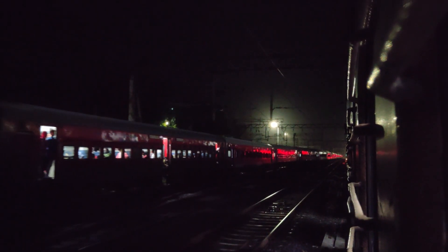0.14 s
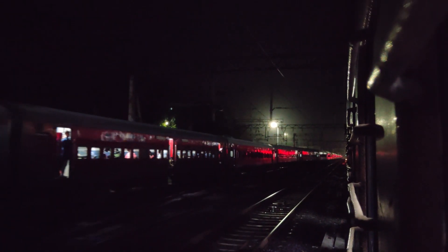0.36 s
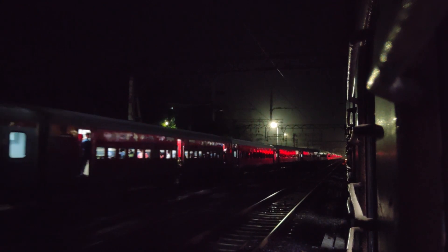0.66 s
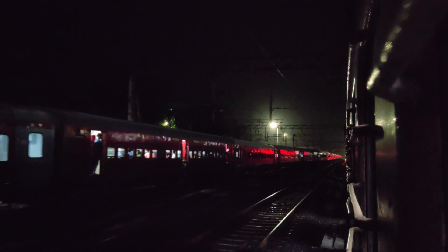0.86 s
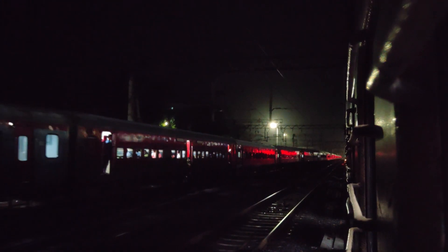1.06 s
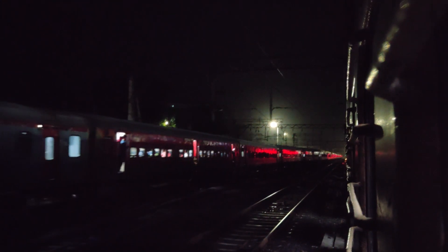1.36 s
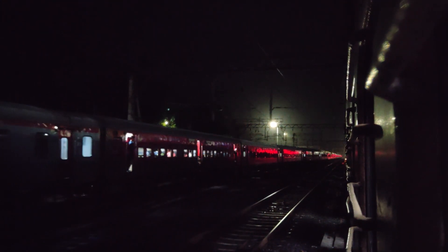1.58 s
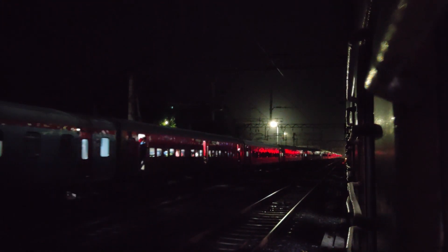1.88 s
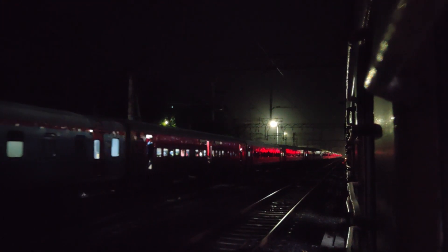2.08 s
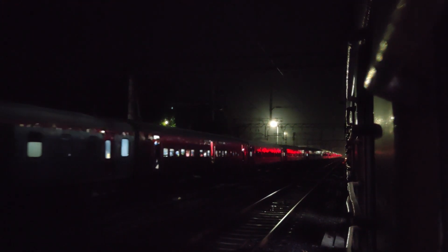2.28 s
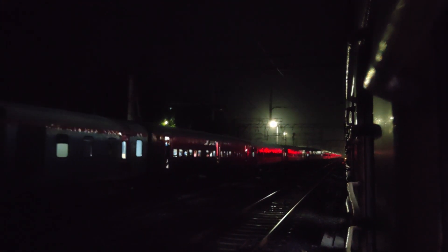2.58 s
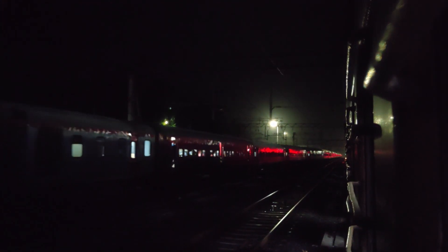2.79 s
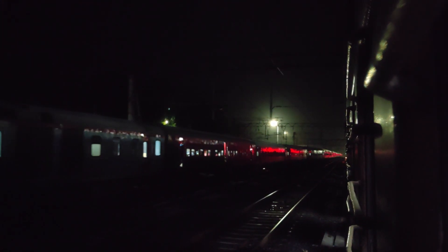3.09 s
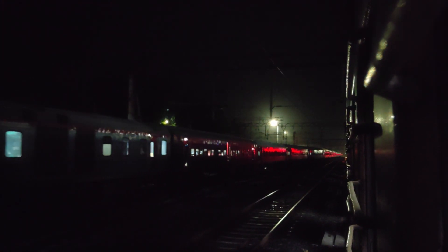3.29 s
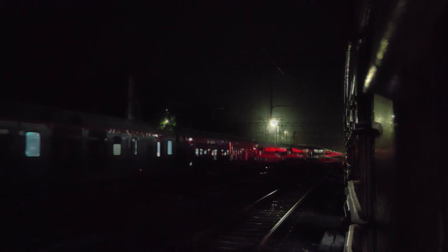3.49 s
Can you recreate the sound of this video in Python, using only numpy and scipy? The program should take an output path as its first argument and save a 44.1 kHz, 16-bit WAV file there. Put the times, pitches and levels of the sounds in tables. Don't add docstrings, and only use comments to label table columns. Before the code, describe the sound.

Diesel generator engine drones steadily past an open train door, with fan roar and soft wheel thuds

```python
import sys
import numpy as np
from scipy import signal
from scipy.io import wavfile
from scipy.ndimage import uniform_filter1d

SR = 44100
rng = np.random.default_rng(int(sys.argv[2]) if len(sys.argv) > 2 else 0)


def generate_wav(sig):
    pcm = np.round(np.clip(np.atleast_2d(sig).T, -1, 1) * 32767).astype(np.int16)
    wavfile.write(sys.argv[1], SR, pcm)


def level_to_linear(level):
    exponent = np.asarray(level, float) / 20
    return 10 ** exponent


N = 160965
T = np.arange(N) / SR

SHAFT_HZ, DOPPLER_HZ = 25.03, 0.145
ABREAST_S, PASSING_S = 1.3, 0.8
FIRINGS_PER_TURN = 3

# time in seconds, level in dB.
FIRING_HUM = [(0, -28), (.75, -26.3), (1.3, -27.7), (1.75, -31), (2.0, -27.7), (2.45, -26), (3.0, -27.5),
              (3.65, -29)]
# time in seconds, level in dB.
OCTAVE_HUM = [(0.05, -27.5), (0.39, -22), (0.61, -27.5), (1.01, -26), (1.25, -26), (1.3, -22), (1.59, -22),
              (1.67, -26.5), (2.18, -20.5), (2.37, -26.5), (2.77, -17.5), (3.22, -20), (3.53, -16),
              (3.6, -19)]
# order in multiples of shaft speed, level in dB.
WEAK_ORDERS = [(1, -50.5), (2, -51.5), (4, -46), (4.5, -41.5), (9, -37), (10, -40.5), (12, -43), (13, -42),
               (28, -46)]
# shaft order, peak in seconds, half-width in seconds,
# level in dB.
SWELLS = [(7, 1.64, 0.83, -32.5), (7, 0.42, 0.28, -35), (7, 1.87, 0.17, -39), (7, 3.55, 0.36, -34),
          (16, 0.29, .3, -27.5), (16, .62, .18, -33), (16, 1.65, 0.39, -27), (16, 2.83, .25, -29),
          (16, 3.5, .25, -38), (17, .05, .2, -27), (17, 0.59, .3, -35), (17, 1.2, .3, -30),
          (17, 2.2, 0.14, -33), (17, 2.1, 0.53, -32.5), (17, 3.17, 0.35, -28), (19, 0.25, 0.23, -30),
          (19, 0.72, 0.25, -25), (19, 1.15, 0.17, -27.5), (19, 1.66, .33, -26), (19, 2.34, 0.35, -27),
          (19, 3.174, 0.18, -25.5), (20, 0.28, 0.39, -25.5), (20, 1.19, 0.51, -28), (20, 2.35, 0.38, -31.5),
          (20, 3.05, .3, -38), (20, 3.6, 0.3, -31.5), (22, .15, .35, -29), (22, 0.9, 0.31, -31.5),
          (22, 2.15, 0.18, -34.5), (23, 0.055, 0.34, -31.5), (23, 0.72, 0.33, -36.5), (23, 1.5, 0.45, -34),
          (25, 0.041, 0.22, -34.5), (25, 0.51, .4, -38), (25, 1.5, 0.51, -25), (25, 2.28, 0.31, -36),
          (22, 3.35, 0.19, -39), (23, 4, .15, -30),
          (13, 1.78, 0.83, -41.5), (13, 2.63, 0.17, -36), (13, 3.22, 0.28, -36), (14, 1.9, 0.13, -32),
              (14, 0.23, 0.11, -43), (13, 0.18, 0.1, -35), (12, 3.5, 0.079, -39.5), (8, 3.215, 0.17, -30),
              (12, 0.13, .15, -35.5), (15, 0.035, 0.05, -39.5),
          (18, .6, .1, -39), (18, 1.1, .35, -38), (18, 3.35, 0.14, -39), (11, 0.26, .4, -42),
                (11, 2.6, .15, -38), (11, 2.6, .2, -40.5), (14, .85, 0.1, -37), (14, 1.38, .15, -33),
                (12, 3.1, 0.1, -37.5), (26, .35, 0.11, -38), (26, 1.6, 0.15, -40), (26, 1.85, .15, -38.5),
                (28, .45, 0.26, -40.5), (24, 1.2, .12, -41), (24, 2.35, 0.11, -42), (13, 1.8, 0.19, -40),
                (16, .1, .15, -37), (17, 1.1, .12, -33.5), (22, .08, 0.1, -34), (23, 1.8, 0.16, -34.5),
                (16, 2.1, 0.17, -36), (16, 3.6, .12, -38.5)]
# time in seconds, shortening in shaft turns.
ECHO_PATH = [(0, -.003), (.6, .018), (1.15, -.002), (1.9, .003), (2.35, .017), (2.85, .036), (3.1, .026),
             (3.65, .036)]

# time in seconds, level in dB.
ROAR_LEVEL = [(0.0, -29), (0.09, -27), (0.16, -30.5), (0.83, -32.5), (1.2, -30), (1.5, -28.5), (1.8, -28),
              (1.89, -26), (1.96, -28), (2.04, -30.5), (2.28, -30), (2.4, -27.5), (2.6, -28), (2.87, -29.5),
              (3.32, -26.5), (3.6, -30), (3.65, -32)]
# frequency in Hz, density in dB per Hz.
ROAR_SPECTRUM = [(420, -28), (650, -7.5), (800, -8.5), (1040, -6.5), (1250, -11), (1620, -11.5),
                 (1800, -15), (3010, -14.5), (4600, -21), (5600, -24.5), (6500, -62.5)]
# frequency in Hz, density in dB per Hz.
FIZZ_SPECTRUM = [(4800, -35.5), (5500, -8), (5900, 2), (6370, 3.5), (6830, 3), (7660, -6.5), (7870, -24),
                 (8220, -51), (8500, -52.5)]
# time in seconds, frequency in Hz, level in dB.
DUCT = [(0, 2380, -42), (.25, 2544, -45.5), (.6, 2733, -46.5), (1.2, 2816, -49), (1.55, 3000, -39.5),
        (2.1, 3034, -43.5), (2.4, 2960, -51.5), (2.7, 2990, -40.5), (3.05, 3025, -42.5), (3.35, 3105, -38),
        (3.65, 2950, -43)]
# share of the duct frequency as a ratio, width in Hz, level in dB.
WHINES = [(0.939, 35, -18), (1, 29.6, -9), (1.08, 39.7, -8.5), (1.201, 40.3, -7.5)]
# time in seconds, frequency in Hz, level in dB.
PANEL = [(0, 1037, -31.5), (.2, 968, -33), (.6, 942, -38), (1.2, 953, -45.5), (1.85, 1047, -38),
         (2.1, 1004, -41.5), (2.95, 1015, -41.5), (3.65, 995, -36)]
# centre in seconds, pitch in Hz, level in dB, length in seconds.
WHISTLES = [(.06, 2330, -42.5, 0.098), (0.031, 2500, -42.5, 0.05), (0.27, 2700, -43.5, .05),
            (.52, 3350, -44.5, 0.025), (0.84, 2750, -48.5, 0.044), (1.3, 2600, -48.5, 0.068),
            (1.53, 2000, -43.5, 0.065), (1.3, 4700, -41, 0.064), (0.81, 3100, -46.5, 0.036),
            (2.7, 3010, -43, 0.065), (2.98, 3080, -44, .07), (3.6, 1700, -41.5, .05), (2.1, 4700, -46, .05),
            (3.47, 7000, -46.5, .05), (2.4, 560, -36.5, 0.038), (1.4, 850, -35.5, 0.058),
            (.3, 1400, -36, .04), (2.63, 1150, -42, 0.045), (2.8, 1200, -43, 0.036), (.4, 1610, -43, 0.026)]

# time in seconds, level in dB.
CASING_LEVEL = [(0, -23), (.15, -24), (.5, -29.5), (1.1, -29), (1.6, -23.5), (1.95, -31), (2.2, -31.5),
                (2.9, -32), (3.3, -34), (3.65, -34)]
# frequency in Hz, density in dB per Hz.
CASING_SPECTRUM = [(250, -6), (340, -6.5), (420, -1), (520, -1.5), (640, -1.5), (760, -14.5), (1000, -26.5)]
# frequency in Hz, density in dB per Hz.
RUMBLE_SPECTRUM = [(20, -22), (40, -28.5), (62, -17), (108, -7.5), (200, 0), (300, -5), (480, -2.5),
                   (900, -22.5), (1200, -46)]
# centre in seconds, pitch in Hz, level in dB, length in seconds.
THUDS = [(1.675, 230, -26, 0.042), (1.795, 250.3, -29, 0.084), (1.883, 219.6, -26, 0.058),
         (2.004, 234.7, -25, 0.067), (2.594, 243, -21, 0.04), (2.702, 250, -26, 0.03),
         (2.908, 232.5, -26.5, 0.05), (2.974, 240, -30, 0.03), (3.145, 254, -23.5, .04),
         (3.406, 228, -22.5, 0.053), (2.3, 265, -29, .04), (3.606, 233, -23, 0.035),
         (2.93, 1000, -27, 0.0054), (2.965, 415, -26, .02), (2.565, 620, -30, .015), (1.27, 1000, -33, .02)]


def evened(x):
    return x / np.sqrt(np.mean(x ** 2) + 1e-20)


def column(table, k):
    rows = np.array(table)
    return np.interp(T, rows[:, 0], rows[:, k])


def slow(rate_hz):
    coarse_t = T[::64]
    rates = np.geomspace(rate_hz / 20, rate_hz, 16)[:, None]
    waves = np.sin(2 * np.pi * (rates * coarse_t + rng.random((16, 1))))
    coarse = (waves / np.sqrt(rates)).sum(0)
    return evened(np.interp(T, coarse_t, coarse))


def noise(spectrum, patchy_db, flicker_db, size=1024):
    hop = size // 4
    frames, hz = N // hop + 5, np.fft.rfftfreq(size, 1 / SR)
    real, imaginary, patches = rng.standard_normal((frames, len(hz), 3)).T
    patches = uniform_filter1d(patches, size=7, axis=0)
    patches = evened(uniform_filter1d(patches, size=18, axis=1))
    flicker = evened(uniform_filter1d(rng.standard_normal(frames), size=5))
    f, level = np.transpose(spectrum)
    shape = np.interp(np.log(hz + 1), np.log(f + 1), level, left=-90, right=-90)
    gain = level_to_linear(shape[:, None] + patchy_db * patches + flicker_db * flicker)
    z = (real + 1j * imaginary) * gain
    return evened(signal.istft(z, nperseg=size, noverlap=size - hop)[1][:N])


def resonate(x, hz, width_hz):
    turn = np.exp(2j * np.pi * np.cumsum(hz) / SR)
    r = np.exp(-np.pi * width_hz / SR)
    return 2 * (turn * signal.lfilter([1 - r], [1, -r], x / turn)).real


def resonate_twice(x, hz, width_hz):
    return evened(resonate(resonate(x, hz, width_hz), hz, width_hz))


def order_levels():
    levels = {FIRINGS_PER_TURN: level_to_linear(column(FIRING_HUM, k=1)),
              2 * FIRINGS_PER_TURN: level_to_linear(column(OCTAVE_HUM, k=1) + 1.2 * slow(rate_hz=16))}
    for order, db in WEAK_ORDERS:
        levels[order] = level_to_linear(db + 2.1 * slow(rate_hz=4))
    for order, peak, width, db in SWELLS:
        swell = level_to_linear(db) * np.exp(-abs((T - peak) / width) ** 3)
        levels[order] = levels.get(order, 0) + swell
    return levels


def path_cycles(order):
    if order > 12:
        ripple = 0.19 * np.sin(2 * np.pi * (order - 19) / 11)
        return order * column(ECHO_PATH, k=1) + 0.27 - ripple
    if order == 2 * FIRINGS_PER_TURN:
        return -0.06
    if order > 3 * FIRINGS_PER_TURN:
        return 0.4
    return 0


def exhaust(turns):
    out = np.zeros(N)
    for order, level in order_levels().items():
        rough = order > 2 * FIRINGS_PER_TURN
        wander_turns = rough * 0.001 * slow(rate_hz=5)
        phase = order * (turns + wander_turns) + path_cycles(order)
        waver = level_to_linear(rough * 0.8 * slow(rate_hz=12))
        out += np.sqrt(2) * level * waver * np.cos(2 * np.pi * phase)
    return out


def clatter(turns):
    firing = np.cos(2 * np.pi * (FIRINGS_PER_TURN * turns - 0.3))
    puff = 1 + 0.16 * np.exp(2.1 * (firing - 1))
    return evened(puff * (1 - 0.055 * np.cos(2 * np.pi * turns)))


def fan_roar(roar_db):
    fizz_db = roar_db.mean() - 10 + 1.05 * (roar_db - roar_db.mean())
    roar = level_to_linear(roar_db) * noise(ROAR_SPECTRUM, patchy_db=0.72, flicker_db=-0.9, size=512)
    fizz = level_to_linear(fizz_db) * noise(FIZZ_SPECTRUM, patchy_db=0.4, flicker_db=0.76, size=512)
    return roar + fizz


def blower_duct(air):
    duct_hz, duct_db = column(DUCT, k=1), column(DUCT, k=2)
    out = level_to_linear(duct_db) * resonate_twice(air, duct_hz, width_hz=710)
    for share, width_hz, db in WHINES:
        whine_hz = share * duct_hz * (1 + 0.012 * slow(rate_hz=5.5))
        level = level_to_linear(duct_db + db + 2 * slow(rate_hz=5))
        out += level * evened(resonate(air, whine_hz, width_hz))
    return out


def panel_and_grille(air, roar_db):
    panel = level_to_linear(column(PANEL, k=2)) * resonate_twice(air, column(PANEL, k=1), width_hz=240)
    grille_hz = 1648 * (1 + 0.0073 * slow(rate_hz=5.3))
    grille_level = level_to_linear(roar_db - 19.5 + 3.8 * slow(rate_hz=10))
    return panel + grille_level * evened(resonate(air, grille_hz, width_hz=58))


def louvre_whistles(air):
    out = np.zeros(N)
    for centre, hz, db, length in WHISTLES:
        envelope = level_to_linear(db + 3) * np.exp(-((T - centre) / length) ** 2)
        whistle_hz = hz * (1 + 0.006 * slow(rate_hz=12))
        out += envelope * evened(resonate(air, whistle_hz, width_hz=55))
    return out


def machinery(turns):
    roar_db = column(ROAR_LEVEL, k=1)
    air = rng.standard_normal(N)
    airborne = fan_roar(roar_db) + blower_duct(air)
    airborne += panel_and_grille(air, roar_db) + louvre_whistles(air)
    flutter = level_to_linear(0.33 * np.sin(2 * np.pi * 12 * T) + 0.46 * slow(rate_hz=20))
    casing = level_to_linear(column(CASING_LEVEL, k=1)) * noise(CASING_SPECTRUM, patchy_db=1.5, flicker_db=-0.5)
    return (airborne * flutter + casing) * clatter(turns)


def wheels():
    roar_db = column(ROAR_LEVEL, k=1)
    rumble_db = -25.5 + 0.75 * (roar_db - roar_db.mean())
    out = level_to_linear(rumble_db) * noise(RUMBLE_SPECTRUM, patchy_db=0, flicker_db=1, size=4096)
    for centre, hz, db, length in THUDS:
        envelope = np.sqrt(2) * level_to_linear(db) * np.exp(-((T - centre) / length) ** 2)
        out += envelope * np.sin(2 * np.pi * hz * (T - centre))
    return out


def scene():
    heard_hz = SHAFT_HZ - DOPPLER_HZ * np.tanh((T - ABREAST_S) / PASSING_S)
    turns = np.cumsum(heard_hz) / SR
    return (exhaust(turns) + machinery(turns) + wheels())[None]


def top_cut(x):
    return signal.sosfilt(signal.butter(12, 8370, fs=SR, output="sos"), x)


def record(dry):
    knee, fade_s = 0.64, 0.0052
    soft = knee * np.tanh(dry / knee)
    mix = soft * np.minimum((T[-1] - T) / fade_s, 1)
    return top_cut(mix)


dry = scene()
out = record(dry)
generate_wav(out)
```